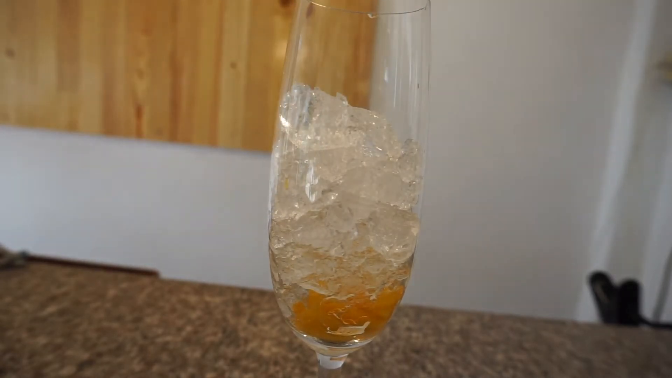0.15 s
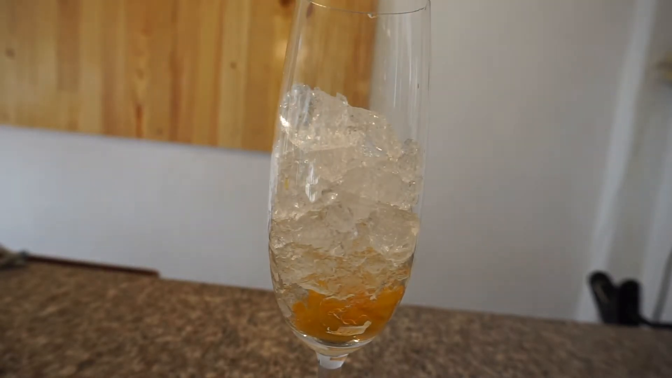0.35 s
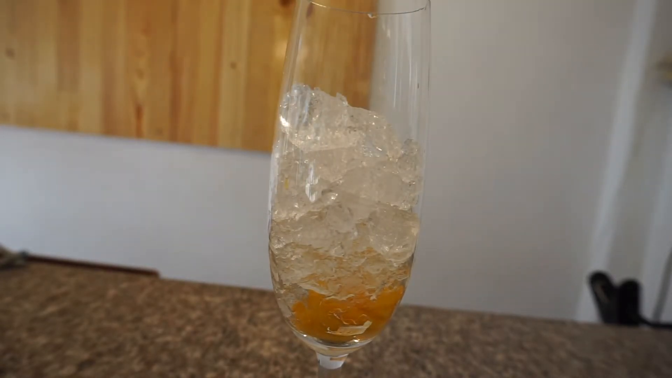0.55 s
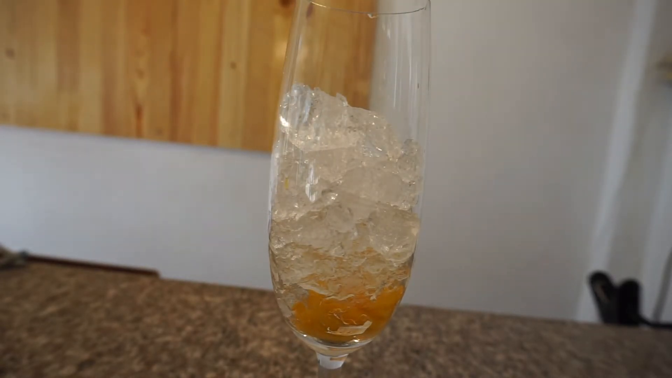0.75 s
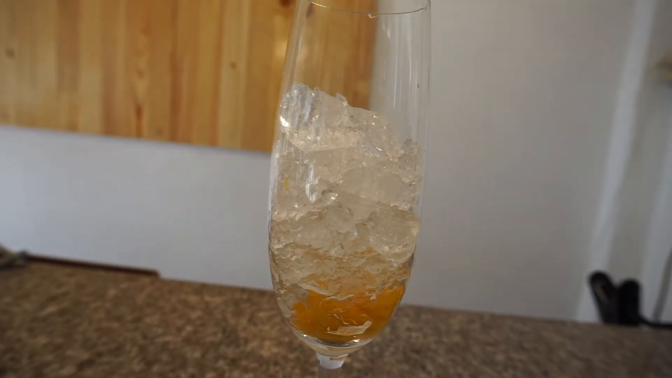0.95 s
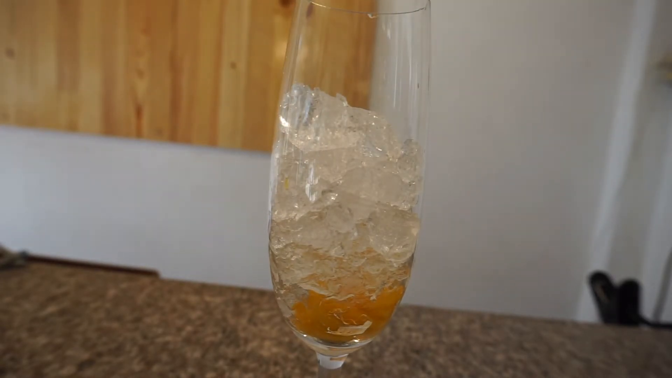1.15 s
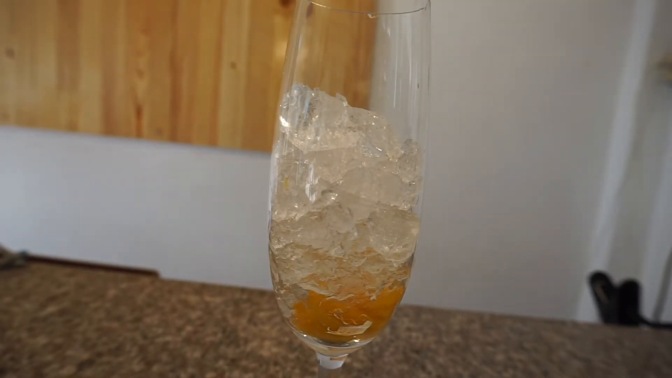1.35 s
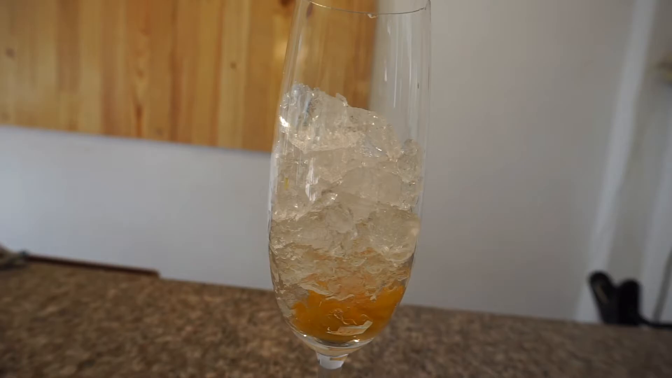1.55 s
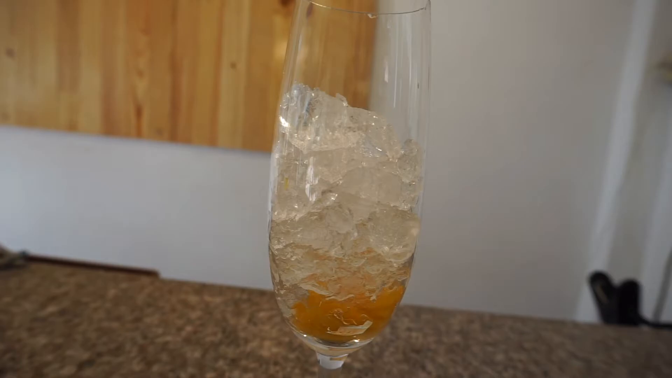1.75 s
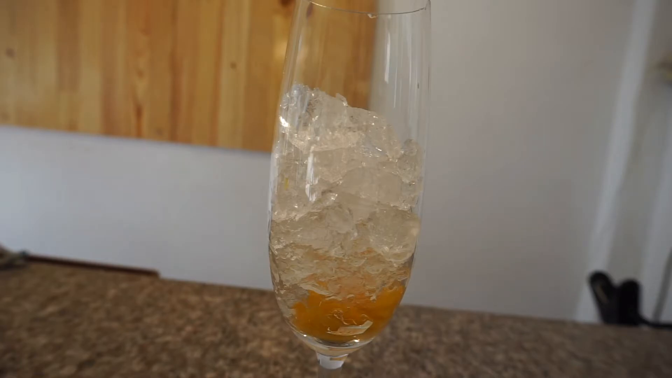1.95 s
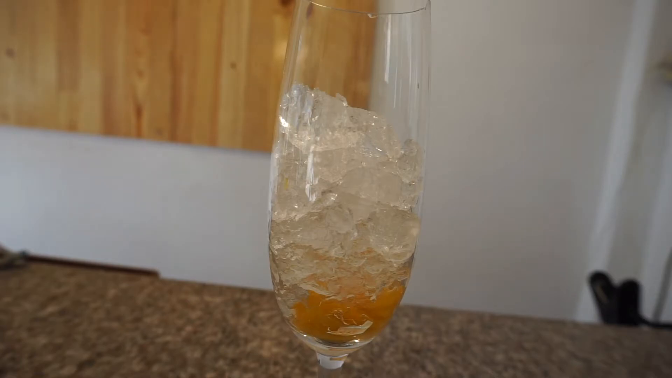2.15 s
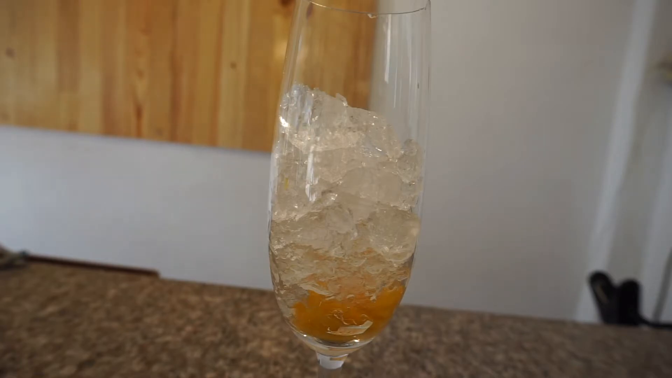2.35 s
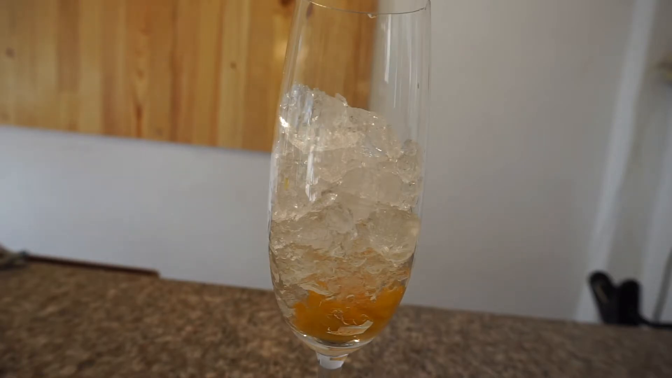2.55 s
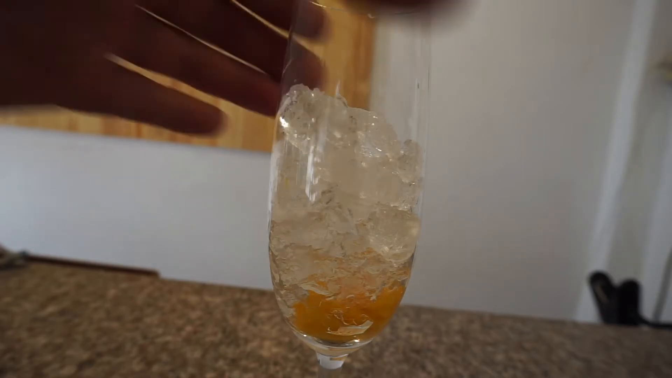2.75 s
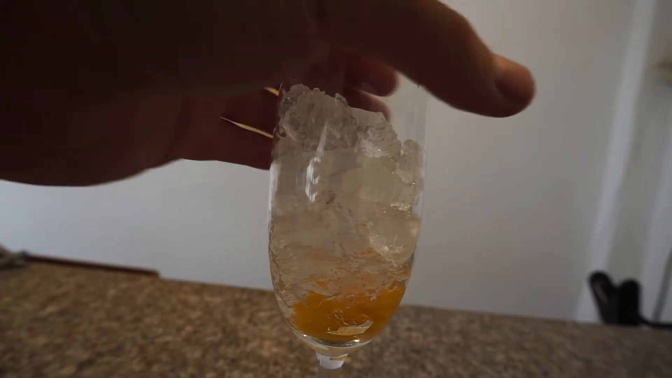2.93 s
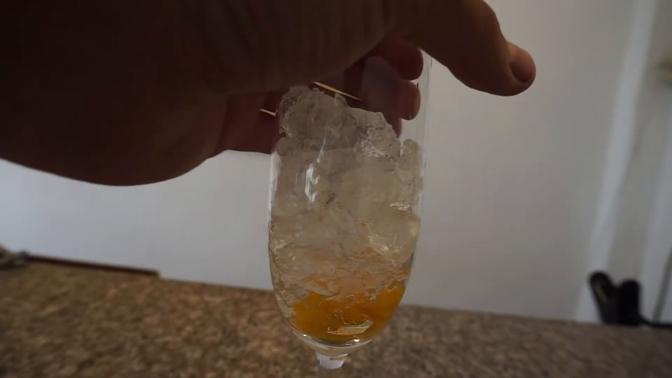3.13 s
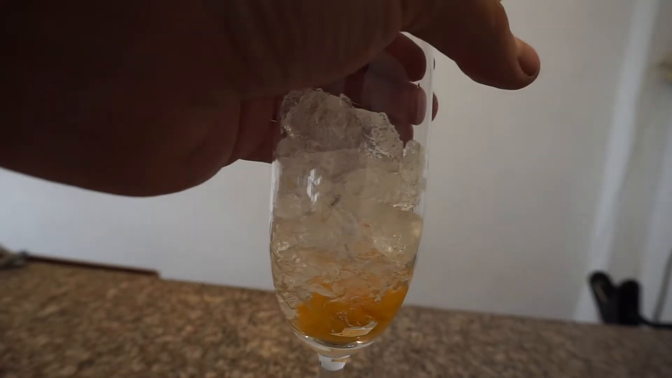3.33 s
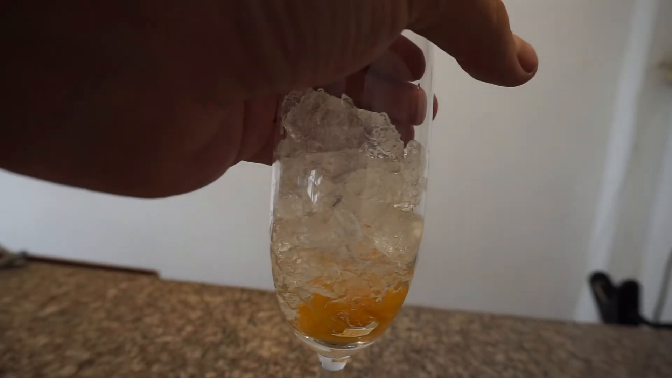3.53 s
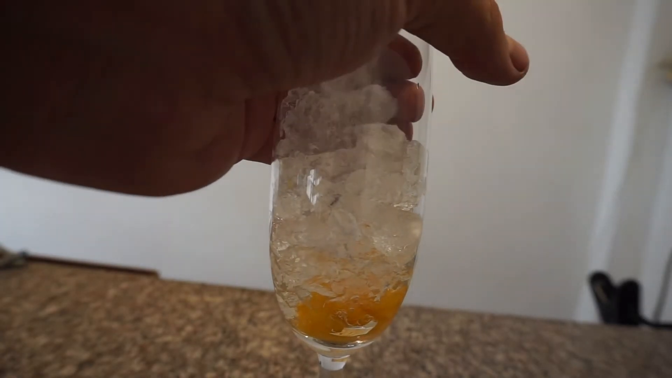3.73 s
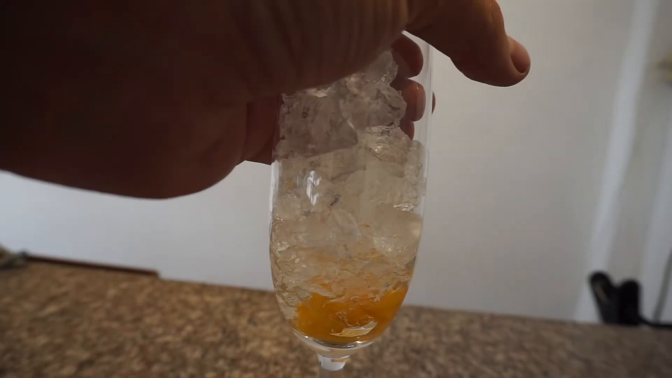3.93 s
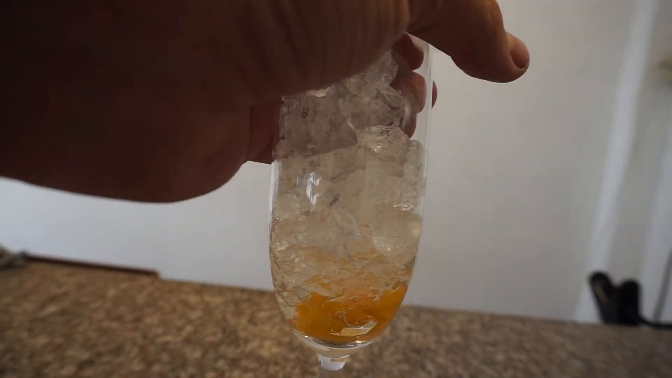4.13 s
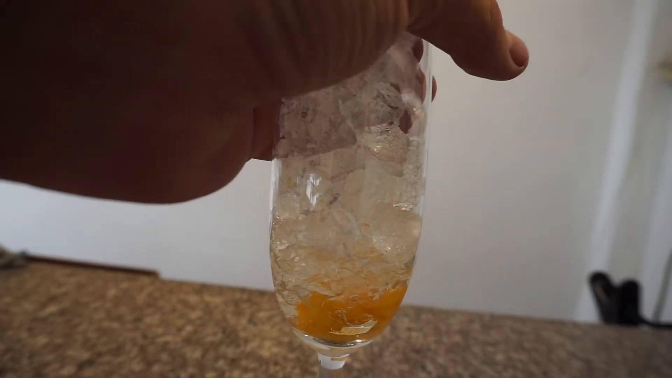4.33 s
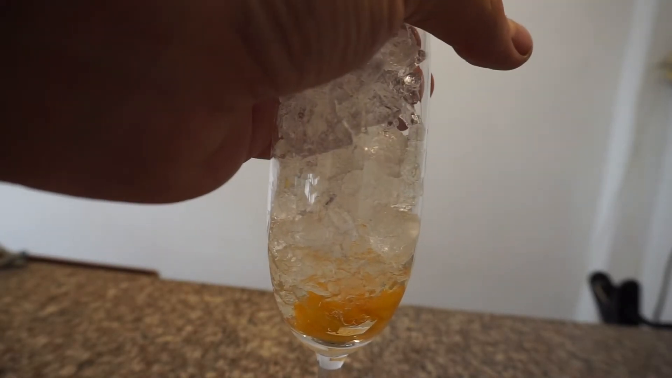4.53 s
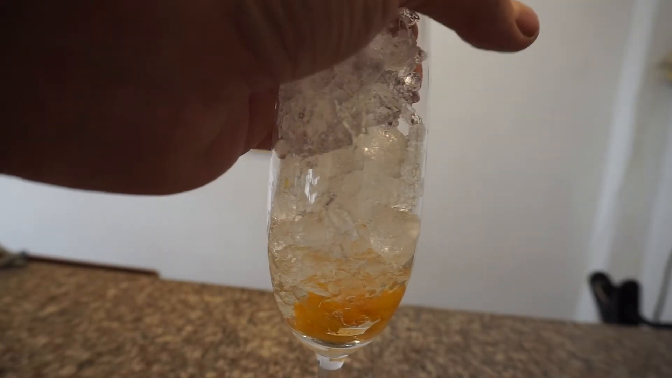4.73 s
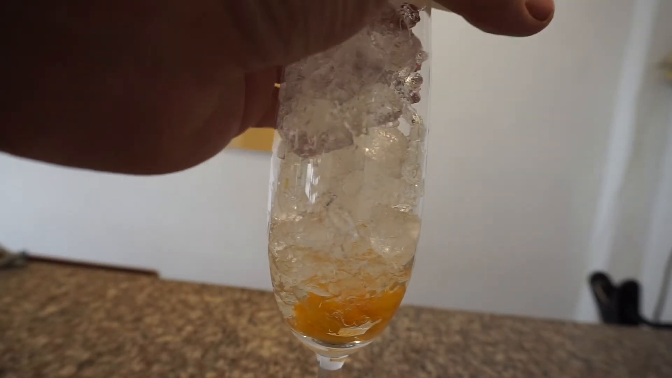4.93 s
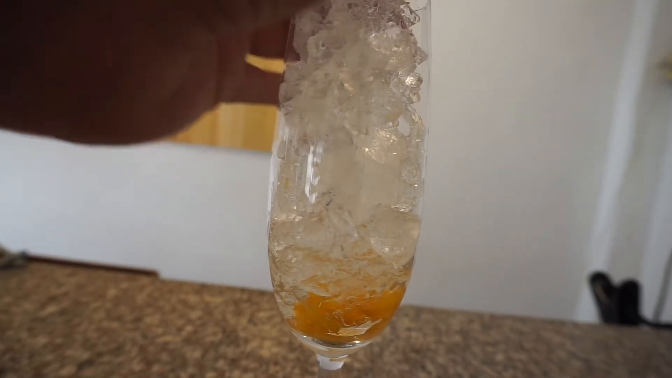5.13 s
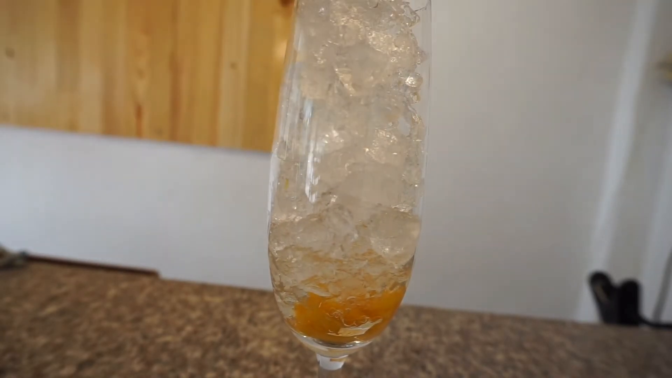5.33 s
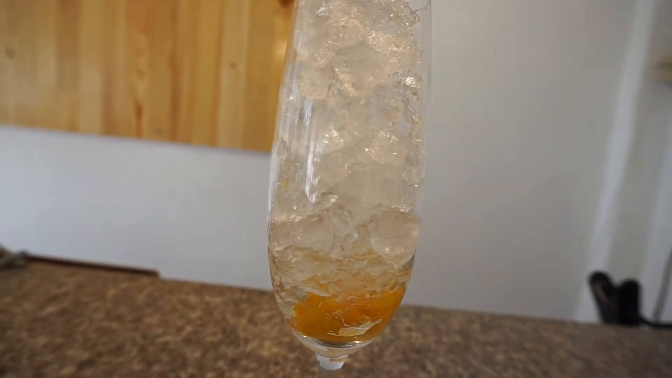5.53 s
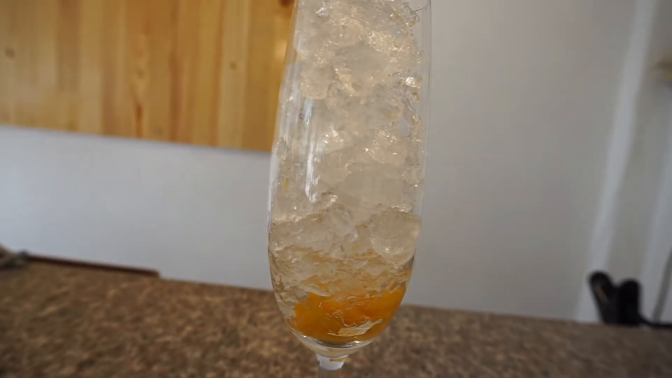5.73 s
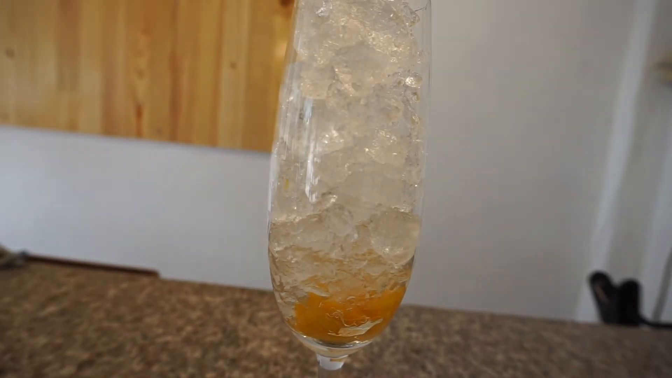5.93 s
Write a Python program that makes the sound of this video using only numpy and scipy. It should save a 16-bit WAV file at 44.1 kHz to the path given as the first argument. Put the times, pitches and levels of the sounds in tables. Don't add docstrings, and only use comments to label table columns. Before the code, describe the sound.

In a hard-walled kitchen with a faint compressor hum, a scoop digs ice from a tub off to the left, rattling and booming in bursts. After a short near-quiet gap, a handful of ice falls into a tall glass close to the stereo microphone: hard knocks, bright chip clinks and crunchy trickling. The fall thins to a few ticks, then one late chunk clinks.

```python
import sys
import numpy as np
from scipy import signal
from scipy.fft import rfft, irfft
from scipy.io import wavfile

SR = 44100
rng = np.random.default_rng(int(sys.argv[2]) if len(sys.argv) > 2 else 0)


def wrap_up_sound(samples):
    columns = np.atleast_2d(samples).T
    tamed = np.clip(columns, -1, 1)
    steps = np.round(tamed * 32767).astype(np.int16)
    wavfile.write(sys.argv[1], SR, steps)


def boost_factor(decibels):
    exponent = np.asarray(decibels, float) / 20
    return 10 ** exponent


N = 263698

# pitch in Hz, level in dB rms.
MOTOR_TONES = [(147, -70), (189.5, -60.5), (285.3, -74), (333.8, -72.5), (619.1, -61.5)]
# frequency in Hz, density in dB per Hz.
HUSH_SPECTRUM = [(30, -46), (125, -30), (200, -10.5), (571, -8.5), (900, -9.5), (3480, -25.5), (9200, -30),
                 (12900, -63)]
# time in seconds, level in dB.
HUSH_DRIFT = [(0.0, 3.5), (2.2, 1.5), (3.1, 2), (5.05, -2), (5.98, 0.5)]
# fullest at seconds, level in dB, rise in seconds, fade in dB per second.
FAR_STIRS = [
    (1.8, -69, 0.71, 13),
    (2.42, -60.5, 0.024, 36),
    (2.85, -59, 0.27, 110),
    (3.13, -60, 0.53, 6),
]

# frequency in Hz, correlation from -1 to 1.
LIKENESS = [(60, 0.4), (220, 0.88), (600, 0.8), (1200, 0.45), (3090, 0.08), (11500, 0.1)]
# frequency in Hz, T60 in seconds.
ROOM_T60 = [(200, 0.92), (1300, 0.87), (3500, 0.81), (9000, 0.49)]
# delay in seconds, level in dB.
ECHOES = [(.0057, -4), (.0105, -9), (.0155, -14), (.019, -10)]

# start in seconds, level in dB.
TABLE_BUMPS = [
    (3.25, -62),
    (3.4, -62.5),
    (3.79, -50),
    (4.0, -55),
    (4.05, -74.5),
    (4.27, -62),
    (5.25, -62),
]
# fullest at seconds, level in dB, rise in seconds, fade in dB per second.
LOW_RUMBLES = [
    (.3, -75, .1, 60),
    (.69, -50.5, .05, 122),
    (3.4, -53.5, .1, 26.5),
    (3.8, -60.5, .05, 56),
    (4.05, -55.5, .1, 56.5),
]

# pitch in Hz, width in Hz, level in dB.
TUB_MODES = [(607, 45, 0), (1400, 81, 4.5), (2150, 370, 27.5), (3460, 120, 26), (4120, 130, -34)]
# fullest at seconds, rattle in dB, rise in seconds, fade in dB per second,
# crackle in dB above the rattle.
SCOOP_STROKES = [
    (0.197, -30.5, 0.003, 70, -10.5),
    (0.246, -25, 0.099, 120, -2.5),
    (0.438, -28, 0.21, 500, -1),
    (0.62, -34.5, 0.077, 101, -8.5),
    (0.658, -21.5, 0.085, 59.5, -2.5),
    (0.934, -33, 0.056, 132, -4.5),
    (1.23, -53, 0.96, 300, -5),
    (1.25, -34, 0.0031, 382, 9.5),
    (1.434, -38, 1, 111, 1.5),
    (1.52, -29.5, 0.11, 278, 0),
]
# start in seconds, peak in dB, pitch in Hz, thud in dB.
SHOVES = [(0.19, -20.5, 2020, -58), (0.235, -23, 2090, -49), (0.279, -11, 670, -44), (0.409, -6, 2150, -53),
          (0.439, -15.5, 610, -47), (0.794, -18, 3320, -34), (0.869, -10.5, 2200, -49),
          (0.934, -36, 565, -54), (0.959, -11.5, 688, -48), (0.655, -6.5, 2150, -41),
          (0.672, -10.5, 2220, -45), (0.699, -4.5, 2130, -47), (0.291, -13.5, 1400, -50),
          (1.249, -12, 2470, -41), (1.269, -16, 2700, -31), (1.319, -21, 1590, -42),
          (1.458, -38, 1790, -23), (1.488, -15, 566, -24.5), (1.52, -14.5, 1600, -60),
          (1.549, -51, 550, -51.5)]
# start in seconds, boom in dB.
WALL_HITS = [(0.235, -31), (0.272, -19), (0.305, -27), (0.437, -24), (0.648, -30), (0.75, -33), (0.8, -44),
             (0.935, -27.5), (1.25, -44), (1.454, -47), (1.53, -30.5)]
# fullest at seconds, level in dB, rise in seconds,
# fade in dB per second.
HEAP_SLUMPS = [
    (.235, -27.5, 0.055, 80),
    (.285, -28.5, 0.039, 120),
    (.44, -30.5, 0.077, 100.5),
    (.76, -31, 0.3, 44),
    (.96, -35, 0.079, 80),
    (1.235, -41, .1, 92),
    (1.46, -46, .02, 150),
]
# fullest at seconds, level in dB, rise in seconds, fade in dB per second.
BLADE_SINGS = [
    (.235, -37, 0.043, 119.5),
    (.415, -33, .01, 200),
    (.66, -28, .02, 66),
    (.79, -34, 0.034, 80),
    (.875, -39, .03, 128),
]
# pitch in Hz, width in Hz, level in dB.
BLADE_MODES = [(2118, 190, -1.5), (3386, 270, -9)]
# start in seconds, level in dB, pitch in Hz.
TUB_CRACKS = [(.206, -26, 2000), (.228, -19, 1460), (.372, -23, 3700), (.629, -22, 2560), (.66, -5.5, 7000),
              (.69, -13, 3160), (.72, -26, 2150), (.76, -24, 2150), (.8, -17, 2020), (.948, -28, 4850),
              (.95, -18, 8500), (1.078, -17.5, 4400), (1.251, -14, 4350), (1.28, -29, 7550)]

# start in seconds, level in dB, pitch in Hz, T60 in seconds.
RIM_RINGS = [(4.274, -13.5, 5390, 0.01), (4.273, -8, 8080, 0.02), (4.273, -10.5, 6550, 0.0074),
             (4.275, -5, 8450, 0.009), (4.274, -7.5, 7710, 0.016), (4.274, -15.5, 4410, 0.012),
             (4.274, -18, 3200, 0.01), (4.622, -28.5, 2470, 0.039), (4.2, -36.5, 3800, 0.017),
             (5.252, -38, 3200, 0.04), (5.252, -27.5, 2460, 0.09), (5.252, -32, 2510, 0.08),
             (5.25, -35, 1600, 0.03), (5.249, -27.5, 1440, 0.012), (5.249, -28, 4400, 0.003),
             (3.282, -39, 1600, 0.02), (3.683, -19, 5800, 0.012), (3.492, -13.5, 3700, 0.012)]
# fullest at seconds, crunch in dB, rise in seconds, fade in dB per second,
# crackle in dB above the crunch.
TRICKLES = [
    (3.452, -37, .05, 53, 9),
    (3.554, -22, 0.032, 51, -7),
    (4.012, -38, 0.1, 48.5, 3),
    (3.955, -30.5, .03, 201, -2),
    (5.3, -48, 0.049, 99, -0.5),
    (4.382, -36.5, 0.14, 56, -4.5),
    (4.576, -36, 0.16, 81, -8.5),
    (4.3, -39.5, 0.35, 114, 0),
    (4.83, -43.5, 0.11, 422, -4.5),
]
# start in seconds, peak in dB, length in seconds, dull part in dB,
# bright part in dB.
CRUMBLES = [(3.28, -30, 0.0059, -4, -14), (3.372, -17, 0.0057, 0, 4), (3.39, -20, 0.12, -7.5, 0),
            (3.445, -25.5, 0.0096, -22.5, -33.5), (3.485, -13.5, 0.022, -21, 1.5),
            (3.53, -18, 0.033, -2, -0.5), (3.789, -24.5, 0.012, -12.5, 9.5),
            (3.808, -8.5, 0.007, -11.5, -42), (3.871, -14.5, 0.012, -44.5, 4), (3.914, -22, 0.019, -6, 3),
            (3.973, -10, 0.012, -14.5, -5), (4.06, -20.5, 0.026, -19, 3), (4.089, -32, 0.0057, -7.5, 11.5),
            (4.1, -10, 0.017, -9.5, -4.5), (4.108, -17.5, 0.04, -0.5, 4), (4.135, -16, 0.0078, 1.5, 1),
            (4.226, -26, 0.017, -2.5, 2), (4.558, -34, 0.012, 8.5, 9), (4.687, -36.5, 0.064, -34.5, 0),
            (5.245, -30, 0.034, -3, 1.5), (4.359, -28.5, 0.012, 0.5, -6), (4.426, -30, 0.055, -26, -8),
            (4.587, -54, 0.021, 3, -10)]
# time in seconds, pitch in Hz.
AIR_PITCH = [(3.2, 832), (3.5, 739), (4.0, 738), (5.4, 718)]
# start in seconds, level in dB.
PLUNGES = [(3.254, -36), (3.282, -26), (3.376, -19), (3.392, -20.5), (3.464, -39.5), (3.491, -26.5),
           (3.607, -32), (3.65, -28.5), (3.683, -42), (3.786, -33.5), (3.83, -39), (3.903, -30),
           (3.92, -40.5), (3.972, -64.5), (4.079, -34), (4.105, -27.5), (4.173, -41), (4.202, -40),
           (4.259, -44), (4.295, -34), (4.566, -32.5)]
# start in seconds, level in dB, pitch in Hz.
CHIP_CLINKS = [(3.283, -31.5, 2790), (3.283, -31.5, 3130), (3.284, -26, 6900), (3.377, -22.5, 4600),
               (3.418, -24.5, 6500), (3.423, -18, 8200), (3.4432, -14, 2800), (3.444, -19, 6000),
               (3.492, -18, 4700), (3.541, -18, 5700), (3.563, -21, 6400), (3.635, -24, 8600),
               (3.66, -21, 6500), (3.683, -17, 4100), (3.703, -24, 3400), (3.795, -19.5, 9200),
               (3.812, -19.5, 5900), (3.83, -24.5, 5500), (3.886, -14, 6000), (3.922, -25, 6200),
               (3.972, -16, 3300), (3.982, -9, 7200), (4.037, -23.5, 7200), (4.079, -27.5, 3000),
               (4.087, -20.5, 7500), (4.106, -13, 4300), (4.107, -23, 7200), (4.115, -22.5, 8800),
               (4.274, -13.5, 5500), (4.274, -7.5, 8250), (4.423, -33, 4100), (4.543, -30, 8230),
               (4.565, -17, 8200), (4.566, -26.5, 2700), (4.604, -42, 6200), (4.623, -30, 7300),
               (4.715, -33, 7300), (4.8, -43.5, 4600), (4.812, -42, 5500), (4.831, -37.5, 4100),
               (4.877, -45, 7600), (4.975, -55, 5800), (5.213, -58, 4800), (5.168, -48, 5800),
               (4.496, -36, 8500), (4.653, -36, 8000), (4.26, -25, 4900), (5.299, -33, 4920),
               (3.7855, -24, 6450)]
# start in seconds, peak in dB, chunk pitch in Hz, chip pitch in Hz, chip in dB.
KNOCKS = [(3.282, -16, 1850, 7600, -37.5), (3.3762, -2.5, 2820, 4570, -20), (3.3765, -6, 1750, 7000, -26),
          (3.4432, -6, 2020, 3500, -25), (3.4644, -14, 2090, 6400, -30.5), (3.491, -3.5, 3320, 8000, -16.5),
          (3.5414, -9.5, 3120, 6600, -20), (3.6072, -10.5, 2240, 5770, -45.5),
          (3.6574, -17.5, 2560, 6300, -27.5), (3.6825, -14, 2700, 6000, -23),
          (3.7858, -16.5, 1950, 7560, -30), (3.8034, -0.5, 2470, 6000, -18),
          (3.8684, -10.5, 2270, 6700, -25.5), (3.8734, -2, 2430, 4270, -32), (3.903, -4, 2170, 3800, -19),
          (3.9399, -27.5, 2400, 6550, -31.5), (3.9716, -4.5, 2040, 4170, -23.5),
          (4.0791, -6, 1880, 3840, -23.5), (4.1051, -9, 1820, 4850, -19.5), (4.1154, -13, 2600, 4300, -21),
          (4.1731, -4.5, 2540, 7830, -20.5), (4.2727, -3.5, 2310, 7860, -18.5),
          (4.5655, -14, 2720, 3930, -30.5), (4.622, -10.5, 2490, 4080, -35),
          (5.2515, -7.5, 2500, 5100, -31)]
# start in seconds, peak in dB, chunk pitch in Hz, chip pitch in
# Hz, # chip in dB above the peak.
LESSER_KNOCKS = [(3.27, -39, 2200, 5600, -32), (3.4242, -13, 2950, 5670, -11.5), (3.446, -12.5, 1930, 3950, -9),
                 (3.532, -22, 3130, 6470, -9.5), (3.563, -22.5, 2350, 6430, -12.5),
                 (3.646, -18.5, 2730, 6390, -18), (3.672, -17, 2400, 6000, -11),
                 (3.719, -24.5, 2660, 3730, -12.5), (3.8084, -9, 2260, 6000, -15),
                 (3.8113, -11, 2500, 6530, -10.5), (3.8184, -13, 2930, 5540, -12.5),
                 (3.8806, -10.5, 2700, 4330, -24), (3.952, -25, 2390, 3850, -20),
                 (3.9806, -10, 2220, 4650, -14.5), (4.07, -17.5, 1810, 3900, -8),
                 (4.086, -22.5, 1860, 8070, -15), (4.1394, -28.5, 2300, 6670, -16),
                 (4.176, -18, 2500, 4260, -16), (4.231, -46, 1500, 4480, -21), (4.2835, -25.5, 2300, 8300, 1),
                 (4.565, -21, 620, 3900, -22), (4.565, -23.5, 1500, 3900, -28), (4.627, -22, 2450, 4460, -26),
                 (5.2578, -20.5, 2520, 5100, -20), (5.271, -32.5, 2510, 4350, -6)]
# start in seconds, peak in dB, chunk pitch in Hz.
TICKS = [(3.4188, -24, 2940), (3.5927, -17, 3120), (3.6327, -20, 2100), (3.7022, -19, 2730),
         (3.795, -29, 2400), (3.8298, -21, 2480), (3.8857, -14, 2560), (3.9194, -19, 2270),
         (3.992, -19, 1920), (4.037, -19, 2150), (4.0466, -12.5, 2180), (4.2024, -18, 2430),
         (4.2586, -20, 2680), (4.423, -20, 2600), (4.542, -34, 2200), (4.6533, -29, 2620),
         (4.7095, -53, 2620), (4.7396, -41, 2570), (4.8305, -45, 2470), (5.244, -35, 2500)]
# start in seconds, level in dB, pitch in Hz.
SETTLES = [
    (4.496, -41, 8000),
    (4.9745, -60, 7500),
    (5.168, -53.5, 7400),
    (5.185, -56, 4610),
    (5.192, -50, 6910),
    (5.299, -52, 8000),
]

# frequency in Hz, phase in radians.
RIGHT_LEAD = [(60, 0), (200, .3), (400, .45), (620, .7), (1200, .65), (2200, .15), (3200, 0)]
# start in seconds, depth in dB.
GAIN_DIPS = [
    (3.37, 5),
    (3.488, 5.5),
    (3.541, 3),
    (3.802, 8),
    (3.974, 6.5),
    (4.109, 8),
    (4.272, 8),
]


def rms_one(x):
    return x / np.sqrt(np.mean(x ** 2) + 1e-20)


def in_time(rows):
    s, *columns = np.transpose(rows)
    return [np.interp(np.arange(N) / SR, s, column) for column in columns]


def at_hz(points, hz):
    table_hz, values = np.transpose(points)
    return np.interp(np.log(hz), np.log(np.maximum(table_hz, 1)), values)


def band(x, low_hz, high_hz):
    edges_hz = [low_hz, min(high_hz, .49 * SR)]
    return signal.sosfilt(signal.butter(2, edges_hz, "band", fs=SR, output="sos"), x)


def high_pass(x, order, hz):
    return signal.sosfilt(signal.butter(order, hz, "high", fs=SR, output="sos"), x)


def resonate(x, hz, width_hz):
    r = np.exp(-np.pi * width_hz / SR)
    poles = [1, -2 * r * np.cos(2 * np.pi * hz / SR), r * r]
    return signal.lfilter([(1 - r * r) / 2, 0, (r * r - 1) / 2], poles, x)


def stereo_bands(length, shape):
    out, edges_hz = 0, 30 * 2 ** np.arange(0, 9.1, .5)
    white = rng.standard_normal((2, 2, length))
    for k, (low, high) in enumerate(zip(edges_hz, edges_hz[1:])):
        centre_hz = np.sqrt(low * high)
        mid, side = band(white[k % 2], low, high)
        alike = np.clip(at_hz(LIKENESS, centre_hz), -1, 1)
        pair = np.sqrt(1 + alike) * mid + np.sqrt(1 - alike) * side * [[1], [-1]]
        out = out + shape(centre_hz) * pair
    return out


def grains(per_s, spread_db):
    sizes = boost_factor(spread_db * np.minimum(rng.exponential(1, N), 4)) * rng.choice([-1, 1], N)
    return rms_one(sizes * (rng.random(N) < per_s / SR))


def ping(hz, t60_s, rise_s, size=2600):
    t = np.arange(size) / SR
    return (1 - np.exp(-t / rise_s)) * boost_factor(-60 * t / t60_s) * np.sin(2 * np.pi * hz * t)


def add(track, s, sound):
    at = round(s * SR)
    track[at:at + len(sound)] += sound


def swells(rows):
    t = np.arange(0, N + 32, 32) / SR
    power = 0
    for s, db, rise_s, fade_db_per_s in rows:
        fade = boost_factor(db - fade_db_per_s * np.maximum(t - s, 0))
        rise = np.clip(1 + (t - s) / rise_s, 0, 1) ** 2
        power = power + (fade * rise) ** 2
    return np.interp(np.arange(N) / SR, t, np.sqrt(power))


def body_and_crackle(rows):
    body = swells(row[:4] for row in rows)
    crackle = swells((s, db + up_db, rise, fade) for s, db, rise, fade, up_db in rows)
    return body, crackle


def place(x, lag, pan_db, tail, wet_db, echo_db):
    response = boost_factor(wet_db) * tail
    taps = np.arange(1200)
    for side in (0, 1):
        for s, db in [(0.00068, -echo_db)] + list(ECHOES):
            offset = taps - (s * SR * (1.01 - 0.011 * side) + lag * (1 - side))
            gain = boost_factor(db + echo_db + pan_db * (.5 - side))
            response[side, :1200] += gain * np.sinc(offset) * (abs(offset) < 12)
    return signal.fftconvolve(x[None], response, axes=1)[:, :N]


def compressor():
    t, out = np.arange(N) / SR, 0
    for hz, db in MOTOR_TONES:
        waver = rms_one(resonate(rng.standard_normal(N), hz * 1.015, 14))
        out = out + boost_factor(db) * rms_one(np.sin(2 * np.pi * hz * t) + 85 / hz * waver)
    return out


def room_hush():
    noise = rms_one(stereo_bands(N, lambda hz: boost_factor(at_hz(HUSH_SPECTRUM, hz))))
    hush = boost_factor(-60.5 + in_time(HUSH_DRIFT)[0]) * noise
    hush = high_pass(hush, 4, 125) + boost_factor(-21.0) * hush
    return hush * boost_factor([[.7], [-.7]])


def far_clatter():
    return np.hypot(boost_factor(-75), swells(FAR_STIRS)) * rms_one(band(grains(870, spread_db=0.5), 540, 798))


def table():
    jolts = np.zeros(N)
    for s, db in TABLE_BUMPS:
        add(jolts, s, boost_factor(db) * ping(45, 0.12, .006))
    shake = rng.standard_normal((2, N))
    rumble = rms_one(band(shake, 240, 302)) + boost_factor(-28.5) * rms_one(band(shake, 20, 90))
    return jolts * [[1.0], [.55]] + swells(LOW_RUMBLES) * rumble


def scoop():
    stroke, bright = body_and_crackle(SCOOP_STROKES)
    chips, lumps = grains(3000, spread_db=2.8), grains(480, spread_db=3.5)
    modes = 0
    for k, (hz, width_hz, db) in enumerate(TUB_MODES):
        if hz > 1000:
            modes = modes + (-1) ** k * boost_factor(db) * rms_one(resonate(chips, hz, width_hz + 40))
    rattle = rms_one(rms_one(modes) + 3.45 * rms_one(band(chips, 950, 4100)))
    out = boost_factor(-0.5) * stroke * rattle

    wall_hz = TUB_MODES[0][0]
    wall = resonate(resonate(lumps, wall_hz, 50), wall_hz, 50)
    boom = rms_one(rms_one(wall) + .45 * rms_one(band(lumps, 480, 1150)))
    thrown = swells((s, db, 0.084, 192.5) for s, db in WALL_HITS)
    low = boost_factor(-4.0) * np.hypot(thrown, boost_factor(-5) * stroke) * boom

    t = np.arange(2600) / SR
    for s, db, hz, thud_db in SHOVES:
        crack = rng.standard_normal(2600)
        thud = .4 * ping(340, .02, .001) + 2.5 * band(crack, 250, 1400) * boost_factor(-1800 * t)
        add(low, s, boost_factor(thud_db + .5) * thud)
        add(out, s, boost_factor(db - 9) * (ping(hz, .03, .001) + .7 * crack * boost_factor(-2500 * t)))

    belly = rms_one(resonate(lumps + chips, 1408, 330))
    low = low + swells(HEAP_SLUMPS) * rms_one(belly + 0.48 * rms_one(band(chips, 616, 1190)))
    blade = sum(boost_factor(db) * rms_one(resonate(chips, hz, width_hz)) for hz, width_hz, db in BLADE_MODES)
    out = out + swells(BLADE_SINGS) * blade
    crackle = bright * rms_one(band(grains(4000, spread_db=2.5), 2340, 9480))
    dug_in = np.arange(N) > .189 * SR
    return out * dug_in, low * dug_in, crackle * dug_in


def rim():
    out = np.zeros(N)
    for s, db, hz, t60_s in RIM_RINGS:
        add(out, s, boost_factor(db) * ping(hz, t60_s, 0.00057, size=8000))
    return out


def trickle():
    flow, bright = body_and_crackle(TRICKLES)
    hollow = swells([(3.17, -41, 0.18, 14)])
    chips = grains(1400, spread_db=4.5)
    pitches_hz, dealt = np.geomspace(1500, 10500, 14), rng.integers(0, 14, N)
    rings = [resonate(chips * (dealt == k) + 1e-18, hz, hz / 10) for k, hz in enumerate(pitches_hz)]
    crunch = rms_one(sum(rings[:7]) + 0.45 * band(chips, 560, 4800))
    crackle = rms_one(sum(rings[7:]) + 0.3 * band(chips, 6100, 14000))
    air = rms_one(resonate(chips, 515, 110) + 0.65 * resonate(chips, 1110, 90))
    return boost_factor(-14.5) * flow * crunch + boost_factor(-23.5) * hollow * air + boost_factor(-3.0) * bright * crackle


def crumbles():
    out, t = np.zeros(N), np.arange(4000) / SR
    chips = grains(3000, spread_db=1.5)
    dull = rms_one(band(chips, 550, 1740))
    body = rms_one(band(chips, 1500, 3100))
    bright = rms_one(band(chips, 4000, 9200))
    for s, db, length_s, dull_db, bright_db in CRUMBLES:
        at = slice(round(s * SR), round(s * SR) + len(t))
        age = 3 * t / length_s
        burst = boost_factor(dull_db) * dull[at] + body[at] + boost_factor(bright_db) * bright[at]
        add(out, s, boost_factor(db - 11) * age * np.exp(1 - age) * burst)
    return out


def clinks(rows):
    out = np.zeros(N)
    for s, db, hz in rows:
        t60_s = 35 / hz
        add(out, s, boost_factor(db) * (ping(hz, t60_s, .0002) + .6 * ping(hz * 1.01, 0.53 * t60_s, .0003)))
    return out


def air_column(s, detune):
    hz = np.interp(s, *np.transpose(AIR_PITCH)) * (1 + 0.038 * detune)
    first = ping(hz, 0.052, 0.00086)
    return first + .55 * ping(hz * 1.171, 0.05, 0.00099) + .4 * ping(hz * 1.084, 0.041, 0.0014)


def knocks():
    hits = list(KNOCKS)
    for s, db, hz in TICKS:
        hits.append((s, db, hz, 4000 * (8900 / 4000) ** rng.random(), db - 13.5))
    hits += [(s, db - 17, 2500, hz, db) for s, db, hz in SETTLES]
    hits += [(s, db, hz, chip_hz, db + up_db) for s, db, hz, chip_hz, up_db in LESSER_KNOCKS]
    out, t = np.zeros(N), np.arange(2600) / SR
    for s, db, hz, chip_hz, chip_db in hits:
        detune, chip_detune = rng.standard_normal(2)
        crack = rng.standard_normal(2600)
        chunk = ping(hz, .009, .0006) + .6 * ping(hz * (1 + .08 * detune), .007, .0005)
        chunk = chunk + 0.11 * band(crack, 1800, 3900) * boost_factor(-60 * t / 0.0055)
        chip = .6 * ping(chip_hz, .006, .0001) + .4 * ping(chip_hz * (1 + .1 * chip_detune), .005, .0001)
        crack_shape = (1 - np.exp(-t / 0.00085)) * boost_factor(-60 * t / 0.022)
        chip = chip + 0.6 * band(crack, 3200, 15000) * crack_shape
        add(out, s, boost_factor(db - 2.5) * chunk + boost_factor(chip_db + 12.0) * chip)
    falls = list(PLUNGES) + [(s, db - 31) for s, db, _ in TICKS]
    for s, db in falls:
        add(out, s, boost_factor(db + 3.0) * air_column(s, rng.standard_normal()))
    return out


def scene():
    t = np.arange(SR) / SR
    build_up = 1 - np.exp(-t / 0.00071)
    tail = stereo_bands(SR, lambda hz: build_up * boost_factor(-60 * t / at_hz(ROOM_T60, hz)))
    tail /= np.sqrt(np.sum(tail ** 2) / 2)
    dull_tail = band(tail, 100, 4600) + boost_factor(1.5) * tail
    left_tail = tail * boost_factor([[1.5], [-1.5]])

    steady = compressor() + room_hush()
    far = place(far_clatter(), lag=1.4, pan_db=5.0, tail=tail, wet_db=4.0, echo_db=-34.0)
    far = far + place(rim() * boost_factor(-9), lag=1.1, pan_db=.6, tail=tail, wet_db=5, echo_db=0)

    rattle, boom, crackle = scoop()
    crackle = crackle + clinks(TUB_CRACKS)
    tub = place(rattle, lag=3.0, pan_db=11.0, tail=left_tail, wet_db=-3.5, echo_db=-51.0)
    tub = tub + place(boom, lag=3.5, pan_db=3.5, tail=tail, wet_db=-12.5, echo_db=-45.0)
    tub = tub + place(crackle, lag=3.6, pan_db=1.5, tail=tail, wet_db=-1.5, echo_db=-8)

    falling = band(trickle() + crumbles() + clinks(CHIP_CLINKS) + knocks(), 697, 23700)
    glass = place(falling, lag=0.76, pan_db=1.0, tail=dull_tail, wet_db=-12.0, echo_db=-7.0)
    ice = high_pass(tub * boost_factor(-2.5) + glass + far, 3, 230)
    return ice + steady + table()


def top_cut(x):
    return signal.sosfilt(signal.butter(12, 12100, fs=SR, output="sos"), x)


def record(dry):
    t, dip_db = np.arange(N) / SR, 0
    for s, db in GAIN_DIPS:
        age = np.abs(t - s)
        dip_db = dip_db + db * (t > s) * np.exp(-age / 0.072) * (1 - np.exp(-age / 0.0065))
    lead = at_hz(RIGHT_LEAD, np.maximum(np.fft.rfftfreq(N, 1 / SR), 1)) * [[-.5j], [.5j]]
    x = irfft(rfft(dry) * np.exp(lead), N) * boost_factor(-dip_db)
    x = signal.sosfilt(signal.ellip(8, .5, 38, 11050, fs=SR, output="sos"), x)
    x = signal.sosfilt(signal.butter(6, 11800, fs=SR, output="sos"), x)
    return top_cut(x)


dry = scene()
out = record(dry)
wrap_up_sound(out)
```